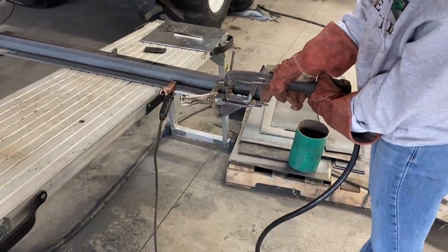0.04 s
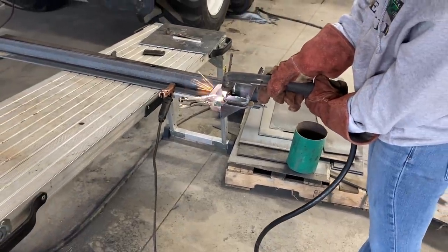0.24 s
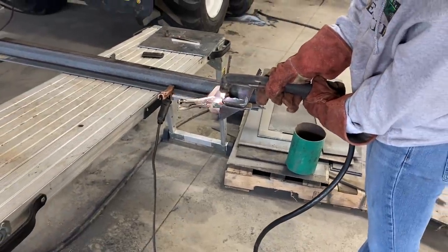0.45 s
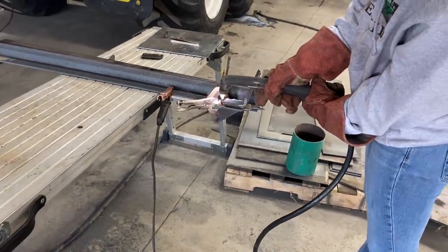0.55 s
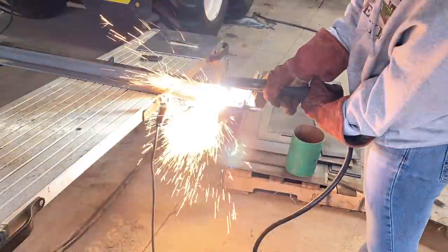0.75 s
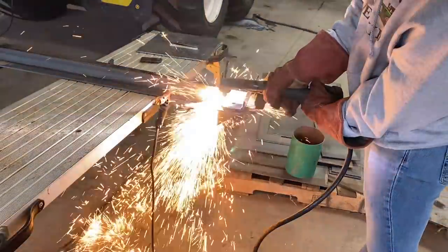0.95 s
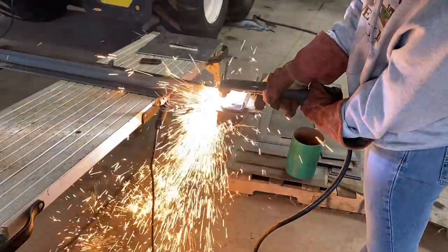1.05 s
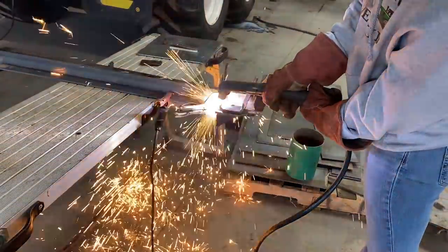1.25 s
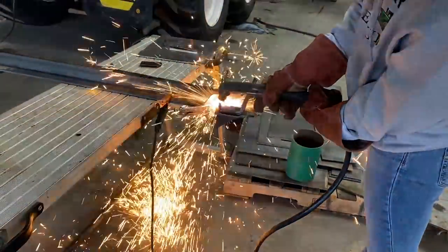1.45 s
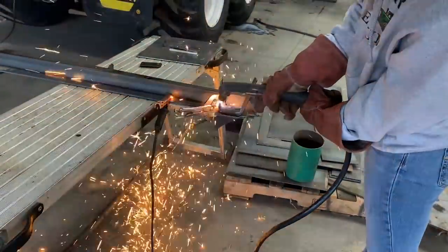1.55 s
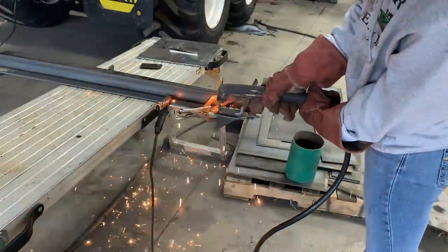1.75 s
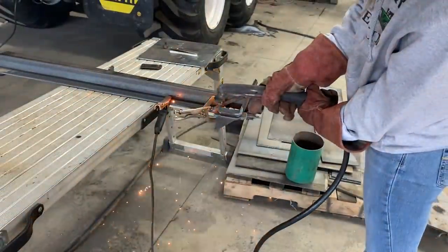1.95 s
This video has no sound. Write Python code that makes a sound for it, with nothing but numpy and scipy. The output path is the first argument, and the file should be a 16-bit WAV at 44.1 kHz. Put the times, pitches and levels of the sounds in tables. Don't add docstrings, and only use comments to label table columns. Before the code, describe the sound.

Plasma torch cutting steel tube: sudden harsh air blast, crackling spray, two pops, then weak hiss

```python
import sys
import numpy as np
from scipy import signal
from scipy.fft import rfft, irfft
from scipy.io import wavfile

SR = 44100
rng = np.random.default_rng(int(sys.argv[2]) if len(sys.argv) > 2 else 0)


def field_ratio(decibels):
    return 10 ** (np.asarray(decibels, dtype=float) / 20)


def wrap_up_sound(samples):
    columns = np.atleast_2d(samples).T
    tamed = np.clip(columns, -1, 1)
    steps = np.round(tamed * 32767).astype(np.int16)
    wavfile.write(sys.argv[1], SR, steps)


N = 88200
T = np.arange(N) / SR
HZ = np.arange(N // 2 + 1) * SR / N + 1


def rms_one(x):
    return x / np.sqrt(np.mean(x ** 2) + 1e-20)


def at_hz(points, hz):
    f, v = np.transpose(points)
    below = v[0] - 30 * (v[0] < -2)
    above = v[-1] - 30 * (v[-1] < -2)
    return np.interp(np.log(hz), np.log(f), v, below, above)


def on_log_hz(points):
    f, v = np.transpose(points)
    return np.interp(np.log(HZ), np.log(f), v)


def drift(rate_hz):
    r = np.exp(-80 * np.pi * rate_hz / SR)
    noise = rng.standard_normal(N // 40 + 2002)
    slow = signal.lfilter([1], [1, -2 * r, r * r], noise)[2000:]
    return np.interp(np.arange(N) / 40, np.arange(len(slow)), rms_one(slow))


# pitch_hz, likeness (0 to 1)
PORT_LIKENESS = [(150, .95), (800, .82), (1300, .9), (2900, .75), (3900, .82), (7000, .4), (8300, .95),
                 (10000, .98)]


def ports(shape, diffuse=False):
    alike = np.clip(on_log_hz(PORT_LIKENESS), 0, 1)
    alike = alike * np.where(diffuse & (HZ > 500) & (HZ < 7500), .4, 1)
    mid, side = rfft(rng.standard_normal((2, N))) * shape
    return rms_one(irfft(np.sqrt(1 + alike) * mid + np.sqrt(1 - alike) * side * [[1], [-1]], N))


def turbulent(spectrum, patchy_db, flutter_db, grain_db):
    whole = rfft(ports(field_ratio(at_hz(spectrum, HZ))))
    out, shared, grain = 0, drift(28.0), drift(137)
    low_hz, high_hz = spectrum[0][0], spectrum[-1][0]
    place = np.log2(HZ / low_hz) * 3
    for k in range(int(3 * np.log2(high_hz / low_hz)) + 2):
        band = irfft(whole * np.cos(np.pi / 2 * np.clip(place - k, -1, 1)) ** 2, N)
        patchy = patchy_db * drift(9.8)
        flutter = flutter_db * (shared + 1.1 * drift(8.2))
        out = out + band * field_ratio(patchy + flutter + grain_db * grain)
    return rms_one(out)


# pitch_hz, level_db
TAIL_COLOUR = [(35, -14), (60, -4), (464, -10.5), (657, -8), (953, -9), (2150, -5), (5980, -11), (7030, -8),
               (15500, -23)]
# pitch_hz, level_db, t60_s
RINGING_METAL = [
    (6990, -57, 0.13),
    (2200, -61, 0.26),
]
# pitch_hz, level_db
ROOM_FLOOR = [(30, -33), (116, 7), (800, -36), (2500, -18), (5000, -13), (7500, -13), (11000, -31),
              (15000, -46)]
TAIL_DB, TAIL_T60_LOW_S, TAIL_T60_HIGH_S, FLOOR_DB = -53.5, 1.0, 0.34, -74


def workshop():
    dull = 1 / (1 + (HZ / 5000) ** 4)
    tail = rfft(ports(field_ratio(at_hz(TAIL_COLOUR, HZ)), diffuse=True))
    out = irfft(tail * dull, N) * field_ratio(TAIL_DB - 60 * T / TAIL_T60_LOW_S)
    out += irfft(tail * (1 - dull), N) * field_ratio(TAIL_DB - 60 * T / TAIL_T60_HIGH_S)
    for hz, db, t60 in RINGING_METAL:
        out += field_ratio(db - 60 * T / t60) * ports(1 / (1 + ((HZ - hz) / 60) ** 2))
    return out + field_ratio(FLOOR_DB) * ports(field_ratio(at_hz(ROOM_FLOOR, HZ)), diffuse=True)


# start_s, level_db
VALVE_LEAK = [
    (.198, -78),
    (.207, -52),
    (.213, -55),
    (.217, -50),
    (0.227, -50),
    (.24, -80),
]
# pitch_hz, level_db
LEAK_COLOUR = [(100, -6), (330, -6.5), (1200, -15), (5000, -18), (10000, -23), (15000, -24)]


def valve():
    s, db = np.transpose(VALVE_LEAK)
    leak = turbulent(LEAK_COLOUR, patchy_db=1, flutter_db=.5, grain_db=1)
    return field_ratio(np.interp(T, s, db, -120, -120)) * leak


# start_s, flow_db, bite_db (into metal), blow_through_db, spray_db (molten metal)
CUTTING = [(0.229, -43, -23, -15, -15), (0.238, -30, -12, -31, -17), (0.262, -21, -18, -29, -15),
           (0.31, -21, -15.5, -28, -9.5), (0.37, -22.5, -9, -25.5, -6.5), (0.54, -21.5, -12, -24, -6.5),
           (0.59, -24.5, -16, -23, -9), (0.665, -26, -17.5, -29.5, -11), (0.734, -20.5, -17.5, -19.5, -6),
           (0.8, -23, -17, -19.5, -6), (0.85, -25, -18, -22.5, -6.5), (1.03, -23.5, -16, -24, -6.5),
           (1.2, -23, -13.5, -16.5, -5), (1.33, -22.5, -17, -20.5, -8), (1.385, -28, -20.5, -30.5, -2.5),
           (1.475, -27.5, -13, -29, -4.5), (1.51, -30.5, -14, -29, -5), (1.72, -30.5, -12.5, -35, -7.5)]
# start_s, flow_db, bite_db, blow_through_db, spray_db
PURGING = [
    (1.745, -38.5, -4, -26, -5),
    (1.79, -39.5, -16, -24, -5),
    (1.83, -38, -19, -38, -8.5),
    (1.885, -38, -8, -31, -7.5),
    (1.93, -41.5, -3.5, -24.5, -3),
    (2.0, -43, -2, -22, -5.5),
]
SHUT_S, SHUT_LENGTH_S = 1.7395, .004


def control(column):
    shut = np.clip((T - SHUT_S) / SHUT_LENGTH_S, 0, 1)
    cut, purge = np.transpose(CUTTING), np.transpose(PURGING)
    cutting = np.interp(T, cut[0], cut[column])
    purging = np.interp(T, purge[0], purge[column])
    return (1 - shut) * cutting + shut * purging


def bench():
    lag_s = rng.uniform(.1, 1, 12) * .02
    sign = rng.choice([-1, 1], 12)
    return 1 + field_ratio(-19) * (sign * np.exp(-2j * np.pi * HZ[:, None] * lag_s)).sum(axis=1)


# pitch_hz, level_db (per Hz)
HISS_COLOUR = [(2000, -12), (4000, -21.5), (7000, -29.5), (8200, 2.5), (10200, 2), (11500, -0.5),
               (13800, 5), (15700, 1)]
SPRAY_COLOUR = [(4200, -1.5), (5000, 1), (6700, 5), (7800, 0), (8800, -48)]
SIZZLE_COLOUR = [(2500, -6), (3100, -8), (3600, -0.5), (4300, -0.5), (5000, -4), (5800, -3.5)]
ROAR_COLOUR = [(350, -15.5), (550, -7.5), (950, -7), (1200, -1), (1600, 0.5), (2300, -0.5), (2800, 2),
               (3200, -7.5)]
GROWL_COLOUR = [(76, -22), (130, 0), (307, 1.5), (349, -3.5), (434, 0), (900, -1.5), (1170, -9),
                (1980, -120)]
RUMBLE_COLOUR = [(18, -44), (30, -16), (54, -6), (96, 4), (134, -13.5), (200, -3.5), (260, -28),
                 (440, -120)]
# pitch_hz, width_hz, level_db
TUBE_RESONANCES = [(1148, 150, -20), (1396, 60, -31), (1813, 190, -26.5), (11340, 710, -7),
                   (8550, 250, -39), (3200, 70, -24)]
HISS_DB, SPRAY_DB, SIZZLE_DB, ROAR_DB, GROWL_DB, RUMBLE_DB = 2, -6.5, -8, -12.5, -20, -27
BITE_MEAN_DB, BLOW_MEAN_DB, SPRAY_MEAN_DB = -12, -19, -6
SIZZLE_FOLLOWS, SPRAY_FOLLOWS, RUMBLE_FOLLOWS = 0.24, 0.69, 0.96
ARC_OFF_S, ARC_OFF_DB = 1.42, -15


def jet():
    flow_db = np.where(T < CUTTING[0][0], -120, control(column=1))
    bite_db = control(column=2) - BITE_MEAN_DB
    blow_db = control(column=3) - BLOW_MEAN_DB
    spray_db = control(column=4) - SPRAY_MEAN_DB
    arc_db = ARC_OFF_DB * np.clip((T - ARC_OFF_S) / 0.065, 0, 1)

    out = field_ratio(HISS_DB) * turbulent(HISS_COLOUR, patchy_db=-1.65, flutter_db=0.72, grain_db=0.55)
    sizzle = turbulent(SIZZLE_COLOUR, patchy_db=-1.0, flutter_db=0.16, grain_db=-3.5)
    out += field_ratio(SIZZLE_DB + SIZZLE_FOLLOWS * bite_db) * sizzle
    roar = turbulent(ROAR_COLOUR, patchy_db=0.35, flutter_db=0.6, grain_db=1.2)
    out += field_ratio(ROAR_DB + bite_db) * roar
    for hz, width_hz, db in TUBE_RESONANCES:
        level_db = db + bite_db * (hz < 3000) + arc_db * (hz < 1500) + 0.82 * drift(4)
        out += field_ratio(level_db) * ports(1 / (1 + (2 * (HZ - hz) / width_hz) ** 2))
    spray = turbulent(SPRAY_COLOUR, patchy_db=0.0, flutter_db=0.0, grain_db=0.9)
    out += field_ratio(SPRAY_DB + SPRAY_FOLLOWS * spray_db) * spray
    rumble = turbulent(RUMBLE_COLOUR, patchy_db=2.0, flutter_db=2.0, grain_db=0)
    out += field_ratio(RUMBLE_DB + RUMBLE_FOLLOWS * blow_db + arc_db) * rumble
    growl = turbulent(GROWL_COLOUR, patchy_db=0.9, flutter_db=0.45, grain_db=-0.6)
    out += field_ratio(GROWL_DB + blow_db) * growl
    return field_ratio(flow_db) * irfft(rfft(out) * bench(), N)


# start_s (middle of the gust), level_db, pitch_hz, length_s
PORT_GUSTS = [(0.355, -56, 75, 0.014), (0.419, -50, 70, 0.018), (0.598, -45.5, 69, 0.02),
              (0.764, -34, 55, 0.031), (0.8, -38.5, 107, 0.0086), (0.884, -48, 47.5, 0.05),
              (1.041, -47, 70, 0.013), (1.147, -41, 103, 0.023), (1.195, -47, 60, 0.022),
              (1.317, -44.5, 76, 0.028), (1.39, -62, 50, .03), (1.507, -65, 60, 0.039),
              (1.758, -72, 60, .02)]


def gusts():
    lean_db = 1.5 * rng.standard_normal((len(PORT_GUSTS), 1, 1)) * [[1], [-1]]
    out = 0
    for (s, db, hz, length), side_db in zip(PORT_GUSTS, lean_db):
        swell = np.exp(-((T - s) / length) ** 2) * np.sin(2 * np.pi * hz * (T - s))
        out = out + field_ratio(db + side_db) * swell
    return out


def wavelet(s, hz):
    return np.exp(-(1.9 * hz * (T - s)) ** 2) * np.cos(2 * np.pi * hz * (T - s))


# start_s, level_db (peak), pitch_hz, crack_db, thump_db
TUBE_POPS = [
    (1.4722, -35, 1500, -40, -60),
    (1.4753, -34, 1800, -36, -60),
    (1.48, -24.5, 1500, -31, -31),
    (1.7389, -30, 1150, -26, -34),
]
ECHO_S, ECHO_DB, ECHO_DULLING = .00168, -5, .66
CRACK_HZ = 4000
THUMP_HZ, THUMP_START_HZ, THUMP_FALL_S, THUMP_DECAY_S = 250, 620, .002, .0042


def pops():
    out = 0
    for s, db, hz, crack_db, thump_db in TUBE_POPS:
        t = np.maximum(T - s, 0)
        sag = (THUMP_START_HZ - THUMP_HZ) * THUMP_FALL_S * (1 - np.exp(-t / THUMP_FALL_S))
        thump = np.exp(-t / THUMP_DECAY_S) * np.sin(2 * np.pi * (THUMP_HZ * t + sag))
        out = out + field_ratio(crack_db) * wavelet(s, CRACK_HZ) - field_ratio(thump_db) * thump
        for k in range(4):
            out = out + field_ratio(db + ECHO_DB * k) * wavelet(s + ECHO_S * k, hz * ECHO_DULLING ** k)
    return out


# pitch_hz, lead_rad
PORT_LEAD = [(0, 0), (1900, .5), (2400, 1.1), (2760, 2.8), (3150, 1.5), (3880, .3), (4900, 1.8), (7060, .7),
             (7500, -1.7), (8050, -2.55)]
HALF_TURNS = [8500, 10080, 12050, 13900, 15650]
# pitch_hz, level_db
PORT_BALANCE = [(40, 1.3), (150, .2), (700, .3), (1300, -2.7), (2300, -2), (3200, .6), (15000, 0)]
DWELL = .8
SWAY_S, SWAY_PER_S = 1.3e-6, 4


def scene():
    turns = np.interp(HZ, HALF_TURNS, np.arange(len(HALF_TURNS)))
    turns = turns - DWELL * np.sin(2 * np.pi * turns) / (2 * np.pi)
    lead_hz, lead_rad = np.transpose(list(PORT_LEAD) + [(HALF_TURNS[0], -np.pi)])
    lead = np.interp(HZ, lead_hz, lead_rad) - np.pi * turns
    half = np.exp(.5j * lead) * field_ratio(on_log_hz(PORT_BALANCE) / 2)
    heard = rfft(workshop() + valve() + jet() + gusts() + pops()) * [half, 1 / half]
    slope = irfft(heard * 2j * np.pi * HZ, N)
    return irfft(heard, N) + SWAY_S * drift(SWAY_PER_S) * slope * [[1], [-1]]


def band_limit(x):
    return signal.sosfilt(signal.butter(12, 16180, fs=SR, output="sos"), x)


def record(dry):
    top_cut = signal.ellip(12, .5, 60, 15730, fs=SR, output="sos")
    mix = signal.sosfilt(top_cut, dry)
    return band_limit(mix)


dry = scene()
out = record(dry)
wrap_up_sound(out)
```